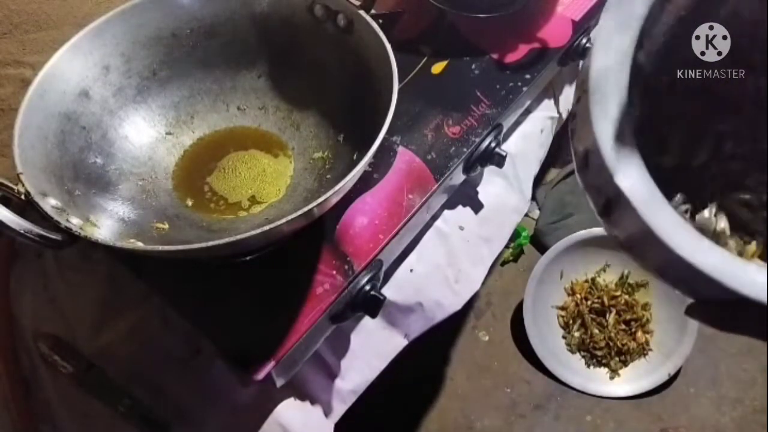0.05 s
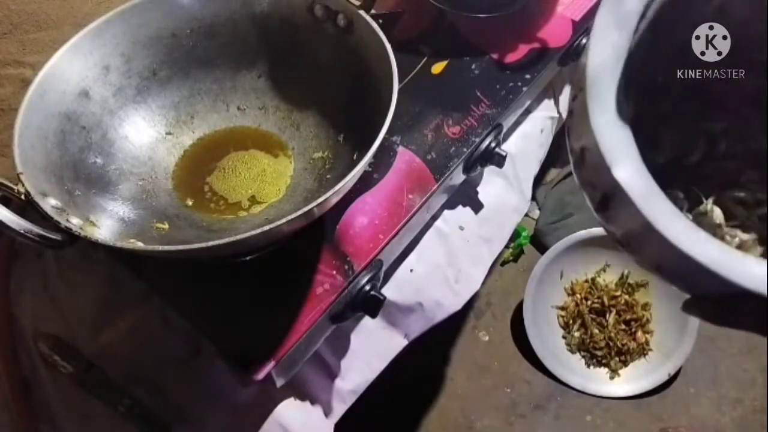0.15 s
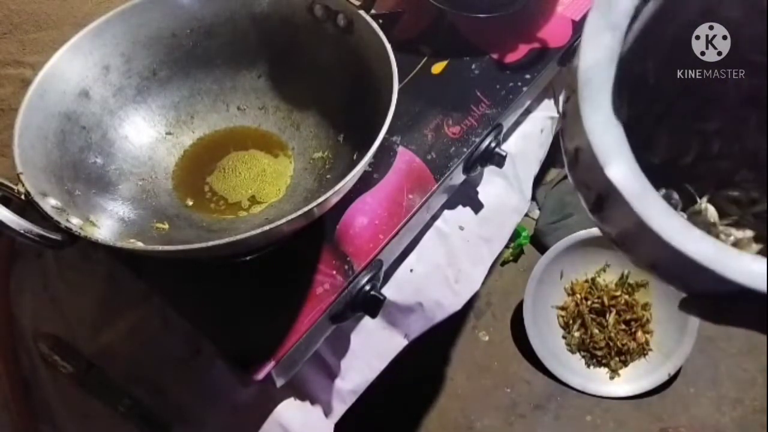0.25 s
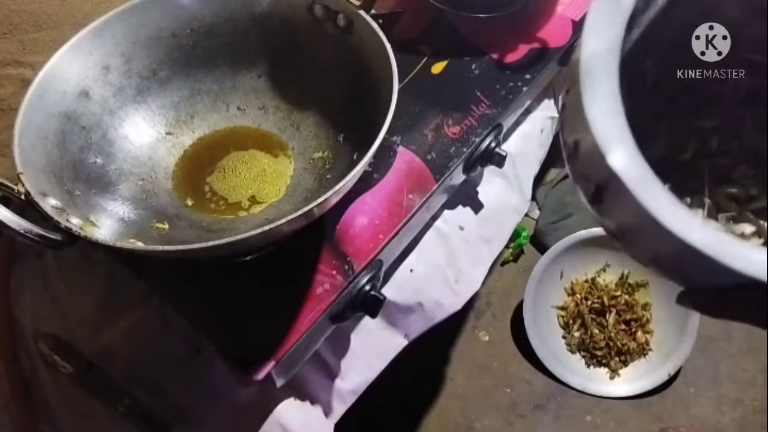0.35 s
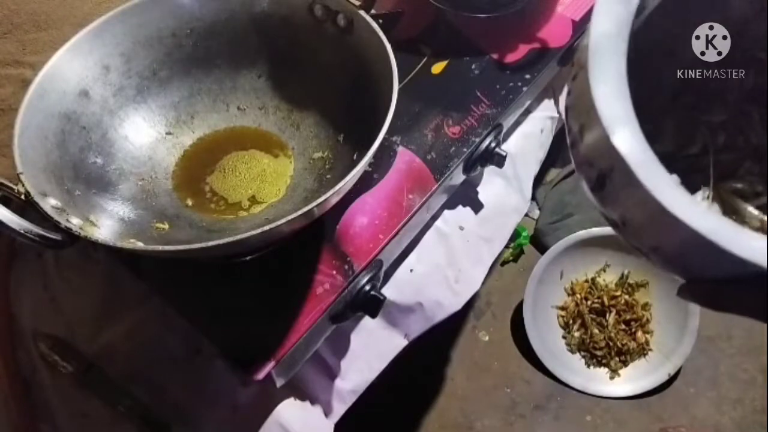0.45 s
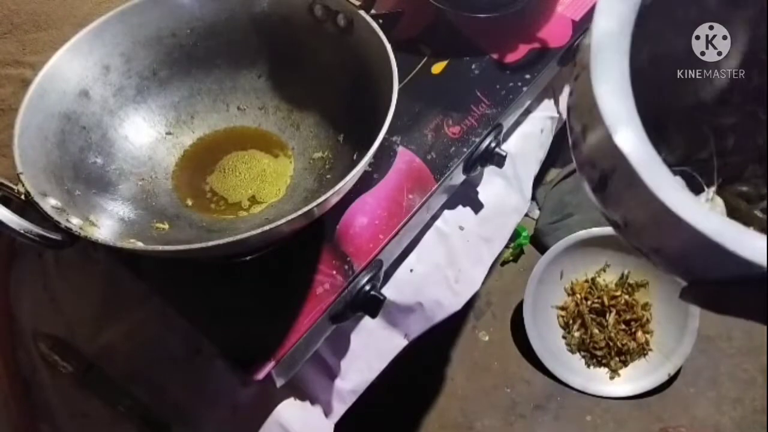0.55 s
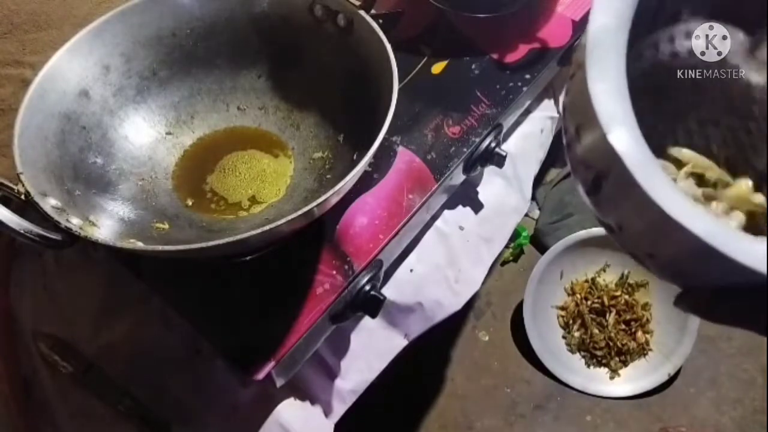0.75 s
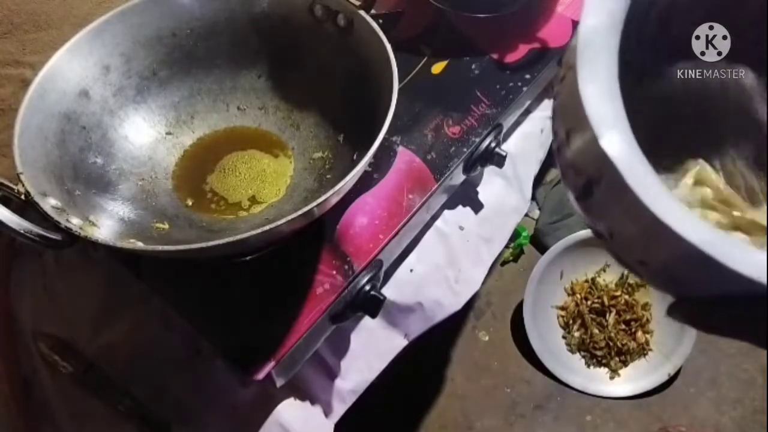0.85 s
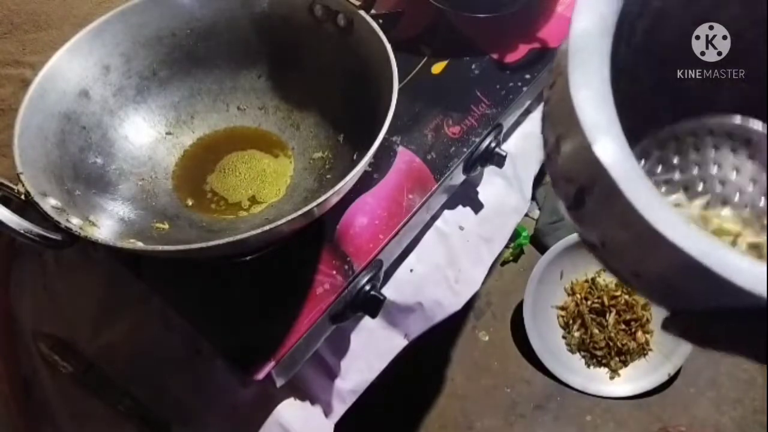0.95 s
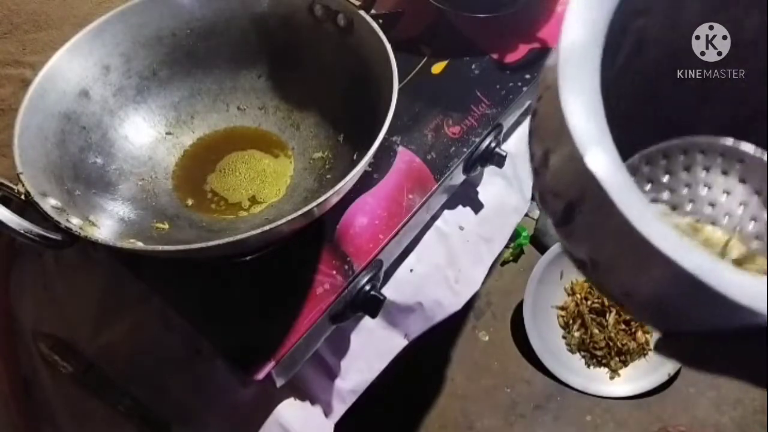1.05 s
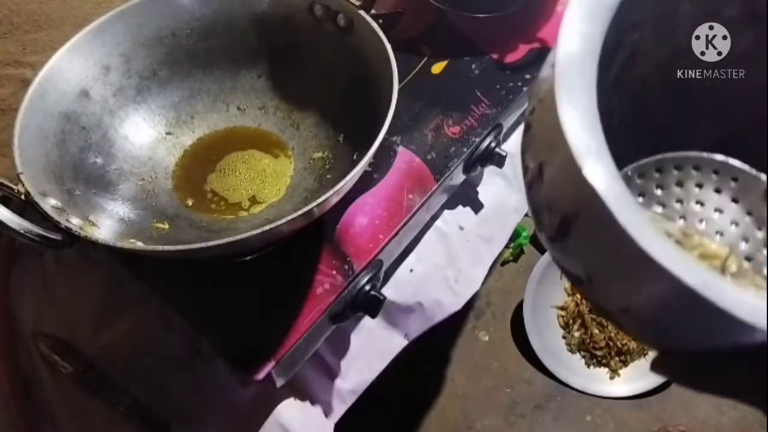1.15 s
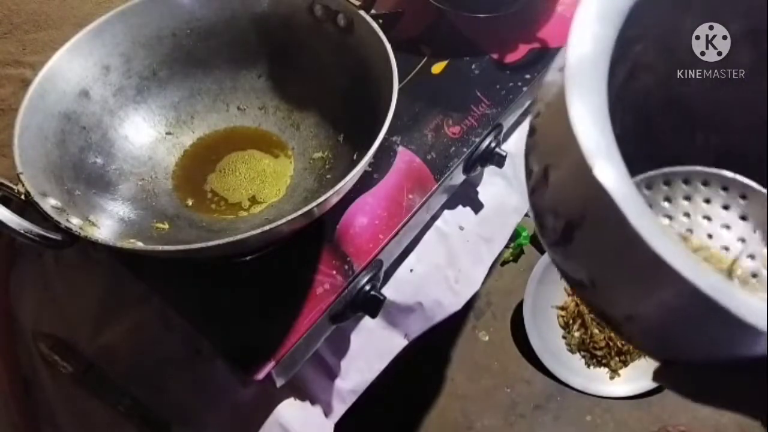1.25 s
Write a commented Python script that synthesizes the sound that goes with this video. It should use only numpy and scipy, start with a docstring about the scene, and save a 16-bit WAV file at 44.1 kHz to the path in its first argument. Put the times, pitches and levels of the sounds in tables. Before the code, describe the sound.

Two hollow clunks come from a metal pot as a strainer hits its wall, a little right of the microphone. A small ping, light clinks and an uneven, rasping scrape follow, with a faint open-air hum underneath.

```python
"""Over a low outdoor hum, a metal pot is tipped by hand above a stove, a little to the right.
The steel strainer inside knocks twice against the wall, each a hollow clunk with a thin ring.
It settles with a small ping, then slides along the wall with a few light clinks: countless tiny
catches keep the metal sounding as a stuttering scrape, with a few harder rasps near the end."""
import sys
import numpy as np
from scipy import signal
from scipy.fft import rfft, irfft
from scipy.io import wavfile
from scipy.ndimage import map_coordinates

SR = 44100
rng = np.random.default_rng(int(sys.argv[2]) if len(sys.argv) > 2 else 0)


def inscribe(sig):
    """Save sig as 16-bit PCM at rate SR to the path in sys.argv[1].

    A 1-D sig is mono; a 2-D sig holds one channel per row.
    Samples are clipped to [-1, 1] before scaling.
    """
    pcm = np.round(np.clip(np.atleast_2d(sig).T, -1, 1) * 32767)
    wavfile.write(sys.argv[1], SR, pcm.astype(np.int16))


N = 57330

# damped resonances of the hand-held pot: pitch_hz, struck_db, scraped_db, struck_t60_s
POT_MODES = [(330, -16.5, -41, 0.013), (440, -17, -3, .032), (505, -38, -1, .03), (617, -47, -2, 0.01),
             (1083, -31.5, -3, 0.013), (1182.7, -21, 4, 0.022), (2228, -24, -4, .045),
             (2707, -52, -16, 0.0067), (2940, -18, -1, .03), (3110, -38, 0, .03), (3365, -28, 0, .04),
             (3532, -52, -3.5, 0.012)]
# EQ of the scraped upper resonances: freq_hz, gain_db
UPPER_EQ = [(1400, -18), (2250, 0), (3650, 0), (4200, -9)]
THUMP_HZ, THUMP_T60_S = 270, .045  # the pot's hollow note
SNAP_RISE_S = .0002


def amp(db):
    """Decibels to gain."""
    return 10 ** (np.asarray(db) / 20)


def unit(x):
    """Scales to rms 1."""
    return x / np.sqrt(np.mean(x ** 2) + 1e-20)


def add(mix, start_s, sound):
    """Mixes a sound in at start_s."""
    part = mix[:, round(start_s * SR):][:, :sound.shape[-1]]
    part += sound[..., :part.shape[1]]


def colour(x, eq):
    """Shapes x with an EQ curve of (freq_hz, gain_db) points, at rms 1."""
    hz, db = np.transpose(eq)
    freqs = np.fft.rfftfreq(x.shape[-1], 1 / SR)
    gain = amp(np.interp(np.log(freqs + 1), np.log(hz), db))
    return unit(irfft(rfft(x) * gain, x.shape[-1]))


def blend(a, b, alike):
    """Left and right from two unrelated signals, with correlation alike."""
    return np.array([a, alike * a + np.sqrt(1 - alike ** 2) * b])


def pair(x):
    """A stereo image, narrow in the bass and wide in the treble."""
    alike = np.interp(np.fft.rfftfreq(x.shape[1], 1 / SR), [600, 1400], [0.95, 0.051])
    return irfft(blend(*rfft(x), alike), x.shape[1])


def wobble(step_s):
    """A random curve that glides to a new value every step_s."""
    return np.interp(np.arange(N) / SR / step_s, np.arange(N), rng.standard_normal(N))


def mode(hz, t60_s):
    """One dying vibration."""
    t = np.arange(SR // 2) / SR
    return np.sin(2 * np.pi * hz * t) * np.exp(-np.log(1000) * t / t60_s)


def burst(eq, t60_s, rise_s):
    """A dense cloud of vibrations that swells and dies."""
    t = np.arange(SR // 2) / SR
    envelope = np.exp(-np.log(1000) * t / t60_s) * (1 - np.exp(-t / rise_s))
    return colour(pair(rng.standard_normal((2, len(t)))), eq) * envelope


def rubbed(ring, slips_per_s=2200, spread_db=3.5):
    """A vibration kept going by a dense train of tiny, uneven catches."""
    size = amp(spread_db * np.minimum(rng.exponential(1, (2, N)), 4))
    sign = rng.choice([-1., 1.], (2, N))
    slips = pair(size * sign * (rng.random((2, N)) < slips_per_s / SR))
    return unit(signal.fftconvolve(slips, np.atleast_2d(ring), axes=1)[:, :N])


def detuned(x, wander, drift=0):
    """The moving contact bends all pitches; wander and drift are fractions of the pitch."""
    clock = np.cumsum(1 + drift + wander * wobble(step_s=.06))
    return np.array([map_coordinates(side, [clock], order=5, mode="mirror") for side in x])


def outdoor_air():
    """The bed: low rumble, a faint wavering hum and a little hiss."""
    # spectrum of the open air: freq_hz, gain_db
    air_eq = [(20, -35), (90, 3.5), (225, -1.5), (520, -7), (5000, -31), (15000, -68)]
    # tones of the hum: pitch_hz, level_db
    hum_tones = [(222, -67.5), (410, -67)]
    noise = blend(*rng.standard_normal((2, N)), alike=0.73)
    hum = sum(amp(db) * rubbed(mode(hz, t60_s=0.42)) for hz, db in hum_tones)
    return hum + amp(-61.5) * colour(noise, air_eq)


def steel_shimmer(count=66, spread_db=5):
    """The thin steel's many treble modes, each reaching left and right with its own strength."""
    scatter = np.clip(rng.standard_normal((count, 4)), -2, 1.5)
    pitches_hz = np.linspace(4100, 15400, count) + 45 * scatter[:, 0]
    stereo_db = spread_db * (scatter[:, 1:2] + 0.27 * scatter[:, 2:])
    return sum(rng.choice([-1, 1]) * amp(db[:, None]) * mode(hz, t60_s=0.067)
               for hz, db in zip(pitches_hz, stereo_db))


def rim_ticks():
    """The rim catches lightly: crisp treble ticks, and one small ping as the strainer settles."""
    # catches of the rim: start_s, level_db
    catches = [(0.412, -21), (0.8316, -16), (0.8355, -21)]
    tick_eq = [(2000, -8.5), (9500, 21), (13000, 14), (15500, -22)]  # freq_hz, gain_db
    out = np.zeros((2, N))
    for start_s, db in catches:
        add(out, start_s, amp(db - 21) * burst(tick_eq, t60_s=.024, rise_s=SNAP_RISE_S))
    add(out, start_s=0.4965, sound=amp(-35) * mode(hz=2330, t60_s=.08))
    return out


def rasps():
    """The hardest strokes of the slide: coarse catches in one broad band of the strainer."""
    # hard strokes: peak_s, half_length_s, level_db, centre_hz
    strokes = [(1.007, 0.046, -43, 2725), (1.183, 0.0026, -41.5, 2970), (1.206, 0.014, -43.5, 3080)]
    t = np.arange(N) / SR
    out = np.zeros((2, N))
    for peak_s, half_s, db, hz in strokes:
        swell = np.exp(-((t - peak_s) / half_s) ** 2)
        ring = mode(hz, t60_s=.006)
        band = signal.fftconvolve(ring, ring)  # steeper skirts
        out += amp(db) * swell * colour(rubbed(band), UPPER_EQ)
    return out


def scrape(steel, sustain=2.5, split_hz=1700, stutter_db=2):
    """The stuttering slide of the strainer drives the pot's resonances and the steel's treble modes."""
    # fader moves of the slide: time_s, lower_db, upper_db, hiss_db
    slide = [(0.217, -77, -89, -67), (0.298, -58, -51.5, -47.5), (0.348, -69, -62.5, -56.5),
             (0.425, -70, -68, -48.5), (0.49, -54.5, -71, -46.5), (0.55, -46.5, -54, -45),
             (0.583, -50, -58, -59), (0.61, -45.5, -60, -49.5), (0.677, -44.5, -51, -49),
             (0.71, -56, -65, -52.5), (0.772, -43, -47, -46.5), (0.82, -48.5, -56, -52),
             (0.90, -52, -53.5, -52), (0.944, -51, -54.5, -48), (0.983, -46, -42.5, -44.5),
             (1.04, -50, -45.5, -43), (1.109, -61.5, -58.5, -57), (1.179, -53.5, -56.5, -52.5),
             (1.215, -45.5, -45, -46.5), (1.264, -62, -61, -59), (1.30, -58, -50, -56)]
    # the hollow note fades as the strainer leaves the bottom: time_s, level_db
    hollow_fade = [(.58, 1), (.65, -13.5)]
    # EQ of the scraped lower resonances: freq_hz, gain_db
    lower_eq = [(60, -16), (260, -2), (600, 1), (820, -5), (1250, 2), (1700, -10)]
    # spectrum of the friction hiss: freq_hz, gain_db
    hiss_eq = [(200, -29), (1500, 20.5), (3400, 22), (4200, 0), (6500, 2), (7500, -3), (9500, 6.5),
               (15200, 0.5), (16000, -16)]
    t = np.arange(N) / SR
    times_s, *faders = np.transpose(slide)
    lower_gain, upper_gain, hiss_gain = [amp(np.interp(t, times_s, db)) for db in faders]
    # the pot rings longer under the light touch of the slide
    rings = [(hz, amp(db) * unit(mode(hz, t60 * sustain))) for hz, _, db, t60 in POT_MODES]
    lower = rubbed(sum(ring for hz, ring in rings if hz < split_hz))
    upper = rubbed(sum(ring for hz, ring in rings if hz > split_hz))
    hollow = amp(np.interp(t, *np.transpose(hollow_fade))) * rubbed(mode(THUMP_HZ, THUMP_T60_S))
    drift = 0.12 * np.maximum(t - 0.68, 0)  # the low pitches rise as the strainer slides out
    lower = colour(detuned(lower + hollow, wander=0.0247, drift=drift), lower_eq)
    upper = colour(detuned(upper, wander=0.00696), UPPER_EQ)
    grit = rubbed(burst(hiss_eq, t60_s=.045, rise_s=SNAP_RISE_S))
    squeal = amp(8) * colour(rubbed(steel), hiss_eq)
    stutter = amp(stutter_db * wobble(step_s=.007))
    metal = lower_gain * lower + upper_gain * upper + rasps()
    return stutter * metal + hiss_gain * unit(grit + squeal)


def knocks(steel, low_cut_hz=417):
    """The strainer hits the wall: a crack, a hollow clunk, a brief rattle with its echo, a thin ring."""
    # two knocks, then light clinks: start_s, body_db, thump_db, crack_db, rattle_db, ring_db
    hits = [(0.2254, 1.5, -27, 2, 3.5, 1), (0.4390, 1.5, -17, 1.5, 7, -1.5),
            (0.5902, -17, -49, -21, -12.5, -8.5), (0.5999, -20, -35, -45, -16, -33),
            (0.846, -27, -38.5, -21, -12.5, -39)]
    # long-ringing modes of the metal: pitch_hz, level_db, t60_s
    ring_modes = [(655, -42.5, .2), (1521, -46, .3), (2228, -39, .25), (3125, -43.5, .45), (3360, -37, .15),
                  (3505, -45, .28), (4130, -53, .7)]
    # spectrum of the contact crack: freq_hz, gain_db
    crack_eq = [(40, -7), (200, 3.5), (2500, 0), (4300, -13), (5700, 8.5), (7600, -11), (9800, 3),
                (14500, 4), (16000, -20)]
    # spectrum of the rattle and its echo: freq_hz, gain_db
    rattle_eq = [(60, -28), (160, -10), (270, 6), (480, 17.5), (780, -0.5), (1100, 9), (1600, -4.5),
                 (2250, 6.5), (3000, 9.5), (3550, 2), (4100, -4), (15000, -4)]
    body = -sum(amp(db) * mode(hz, t60) for hz, db, _, t60 in POT_MODES)
    ring = -sum(amp(db) * mode(hz, t60) for hz, db, t60 in ring_modes)
    thump = -mode(THUMP_HZ, THUMP_T60_S)
    shimmer = amp(-33) * steel / np.std(steel[:, :SR // 100])  # level set by its first 10 ms
    out, recoil = np.zeros((2, 2, N))
    for start_s, body_db, thump_db, crack_db, rattle_db, ring_db in hits:
        crack = amp(-21) * burst(crack_eq, t60_s=0.022, rise_s=SNAP_RISE_S)
        rattle = amp(-28) * burst(rattle_eq, t60_s=0.12, rise_s=0.002)
        echo = amp(-38.5) * burst(rattle_eq, t60_s=0.27, rise_s=0.019)
        add(out, start_s, amp(body_db) * body + amp(ring_db) * ring + amp(thump_db) * thump)
        add(out, start_s, amp(crack_db) * (crack + shimmer) + amp(rattle_db) * (rattle + echo))
        add(recoil, start_s, amp(body_db - 42.5) * mode(hz=77, t60_s=0.03))  # the whole pot moves
    low_cut = signal.butter(2, low_cut_hz, "high", fs=SR, output="sos")  # a small pot has little bass
    return signal.sosfilt(low_cut, out) + recoil


def scene():
    """The pot sits to the right in the open air, so it mostly reaches the left later and weaker."""
    # paths from the pot to the two microphones: freq_hz, left_lead_rad, left_minus_right_db
    paths = [(98, 0.21, -1.5), (640, -0.83, -2), (1156, -1.77, -6), (1420, -1.8, 3.5), (2380, -1.84, -3),
             (3050, -0.56, -1), (3110, -1.61, -0.5), (13500, -1.28, 1)]
    steel = steel_shimmer()
    left, right = rfft(knocks(steel) + rim_ticks() + scrape(steel), 2 * N)
    hz, *curves = np.transpose(paths)
    lead, balance_db = [np.interp(np.fft.rfftfreq(2 * N, 1 / SR), hz, curve) for curve in curves]
    pot = irfft([left * amp(balance_db / 2) * np.exp(1j * lead), right * amp(-balance_db / 2)])
    return pot[:, :N] + outdoor_air()


def record(dry):
    """A steep low-pass trims the very top."""
    low_pass = signal.firwin(255, cutoff=15900, window=("kaiser", 9), fs=SR)
    return signal.oaconvolve(dry, low_pass[None], "same")


dry = scene()
out = record(dry)
inscribe(out)
```